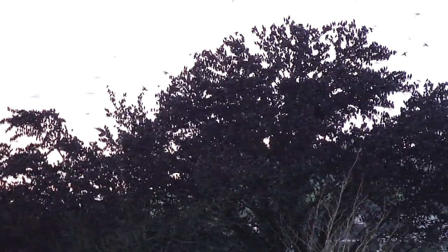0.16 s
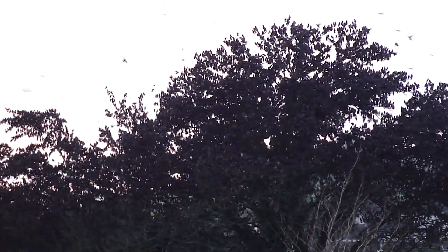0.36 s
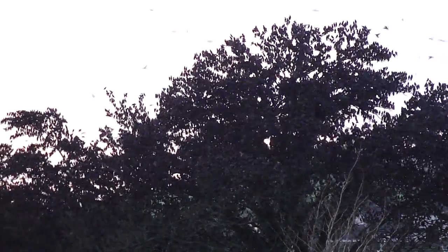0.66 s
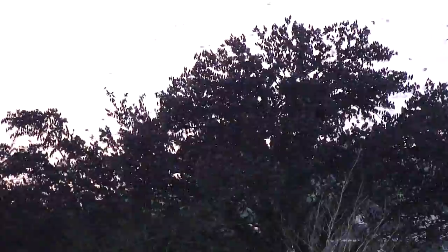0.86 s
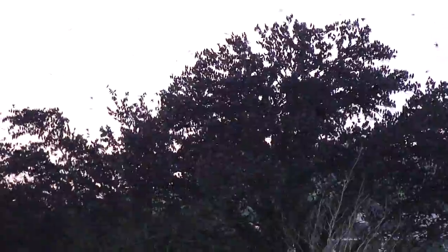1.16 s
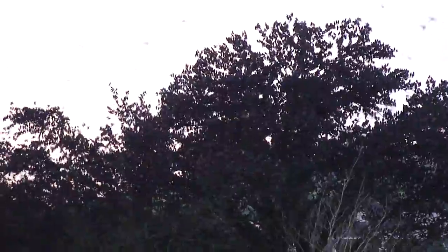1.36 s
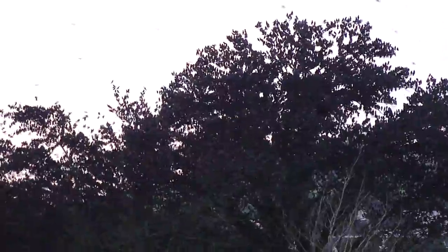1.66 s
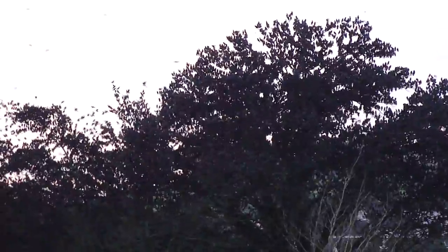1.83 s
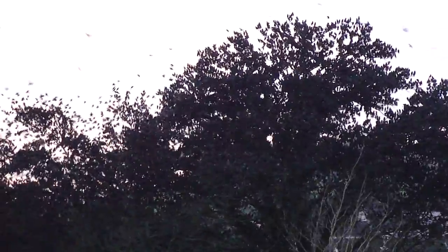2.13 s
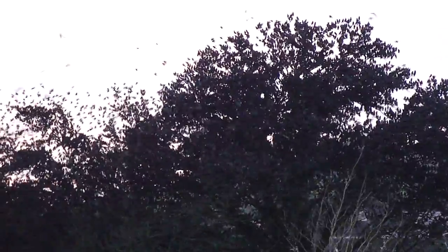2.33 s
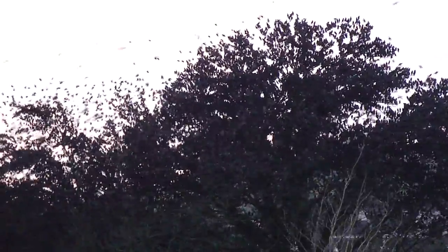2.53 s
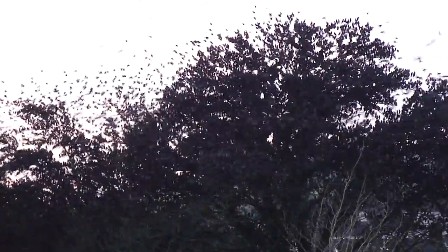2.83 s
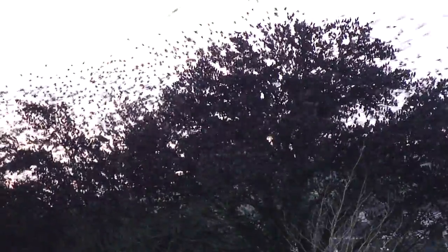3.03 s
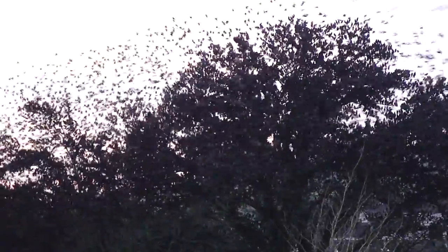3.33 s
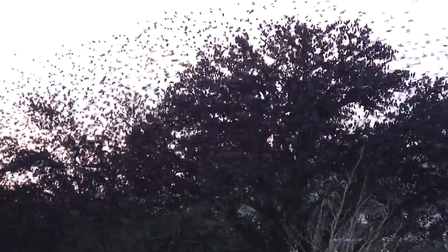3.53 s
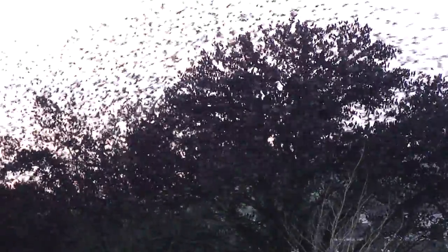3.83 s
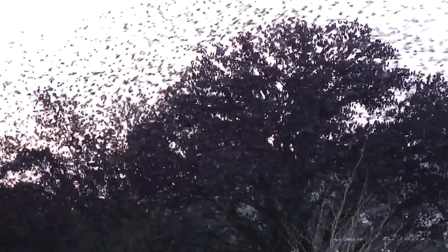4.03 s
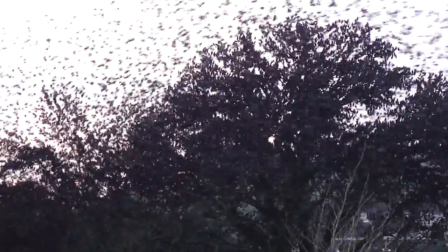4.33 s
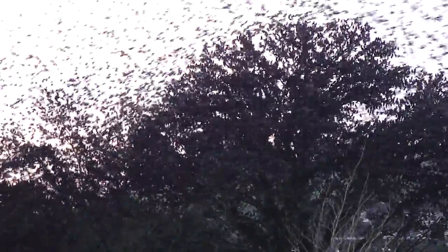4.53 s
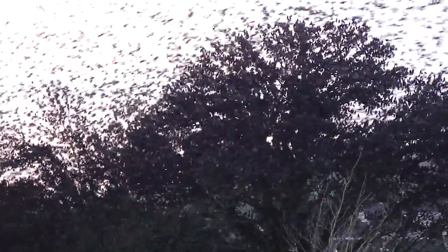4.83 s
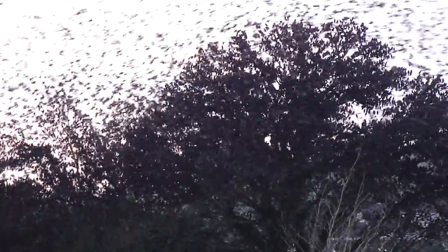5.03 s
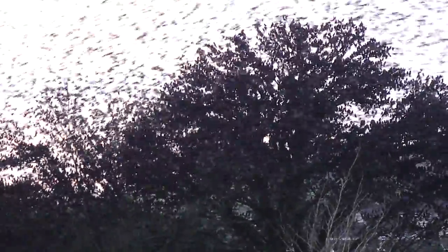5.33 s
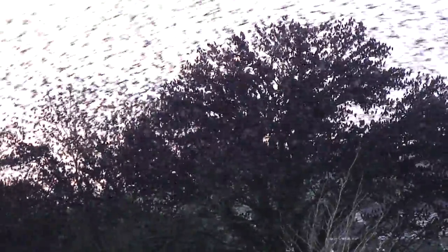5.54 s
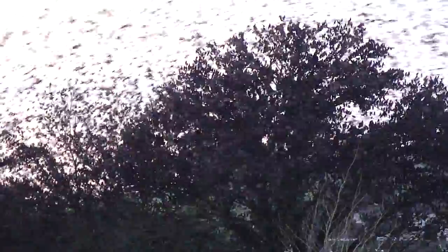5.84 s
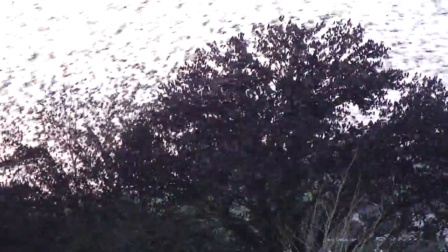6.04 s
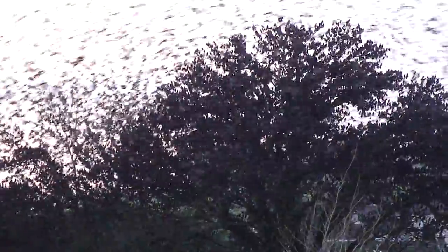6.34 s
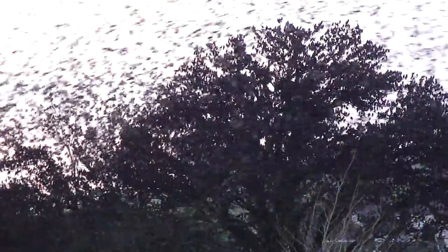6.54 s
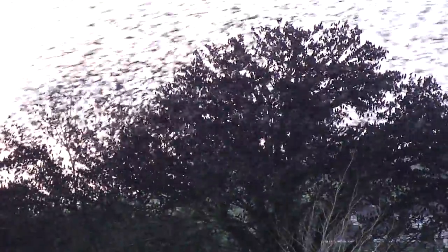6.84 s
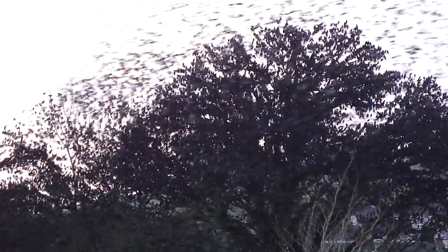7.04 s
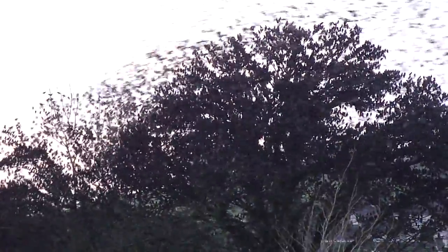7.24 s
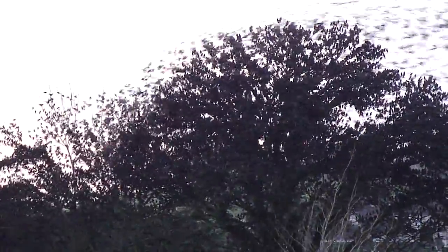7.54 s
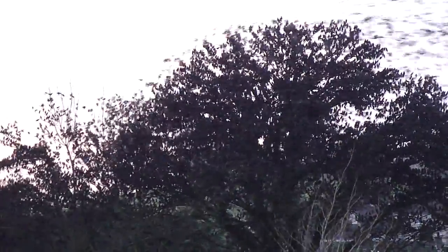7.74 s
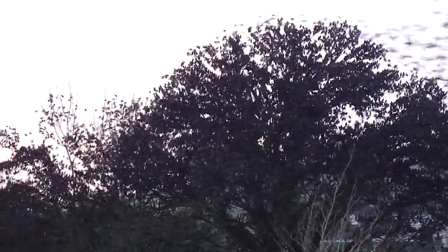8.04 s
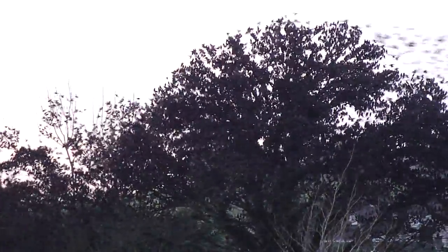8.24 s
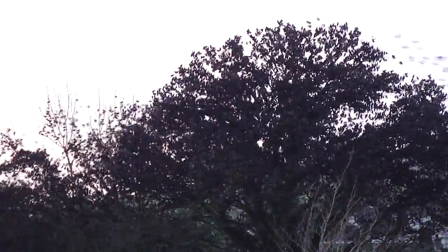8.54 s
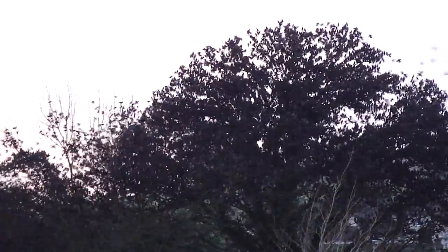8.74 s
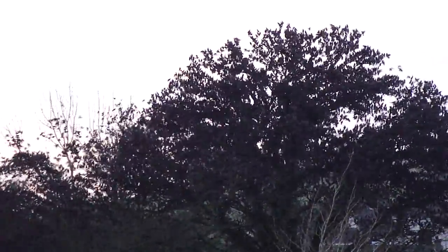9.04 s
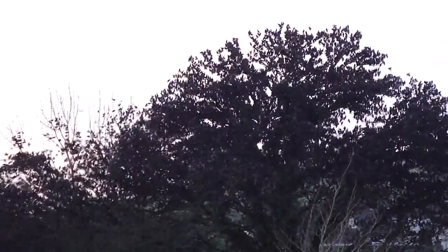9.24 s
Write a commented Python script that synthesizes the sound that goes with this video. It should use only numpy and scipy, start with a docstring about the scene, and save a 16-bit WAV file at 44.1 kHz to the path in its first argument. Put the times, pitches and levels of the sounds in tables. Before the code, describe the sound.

Thousands of roosting starlings rasp and whistle, then lift off, leaving thinner twittering flurries, a brief clear songbird phrase and swelling airy noise.

```python
"""Starlings leaving their roost at dusk

A wall of rasping calls in the trees thins out as the flock takes off. Crowds are built from many short,
harsh tones of unsteady pitch; twittering flares up in flurries, and whistles and screeches stand out.
A songbird close by sings one short phrase made of gliding tones. Behind them lie a far babble of lower
voices and a soft rush of shaped noise that swells at the end."""
import sys
import numpy as np
from scipy import signal
from scipy.fft import rfft, irfft, next_fast_len
from scipy.io import wavfile
from scipy.ndimage import uniform_filter1d

SR = 44100
rng = np.random.default_rng(int(sys.argv[2]) if len(sys.argv) > 2 else 0)


def generate_wav(sig):
    """Save sig (samples, or channels by samples) to the path in sys.argv[1] as 16-bit PCM at SR."""
    pcm = np.round(np.clip(np.atleast_2d(sig).T, -1, 1) * 32767).astype(np.int16)
    wavfile.write(sys.argv[1], SR, pcm)


N = 414099
TIME = np.arange(N) / SR

# Tone shaping of the perched birds' calls: f/Hz, level/dB
ROOST_COLOUR = [(1800, -34), (2800, -8), (3600, -6), (4100, -6.5), (4600, -3.5), (5050, 0.5), (5250, -0.5),
                (5450, 2), (5600, -2.5), (5850, 2.5), (6400, 0), (7000, -7), (7600, -4.5), (8500, -16.5)]
# Tone shaping of the calls on the wing: f/Hz, level/dB
FLIGHT_COLOUR = [(2400, -10), (3300, -0.5), (3900, 0.5), (4130, -1.5), (4700, 1.5), (4870, 2.5),
                 (5050, 2.5), (5270, 2), (5450, 2), (5600, 1.5), (6000, 2), (7000, -6.5), (7600, -10),
                 (8500, -36)]
# Tone shaping of the shrill top of the calls: f/Hz, level/dB
SHRILL_COLOUR = [(6300, 0), (7400, -0.5), (8000, 0.5), (8600, -1.5), (9200, -4.5), (10000, -11.5),
                 (11000, -40)]
# Chatter of the birds on the wing, with a hush soon after take-off: t/s, level/dB
FLIGHT_LEVEL = [(2.6, -44.5), (3.6, -42.5), (4.25, -52.5), (5.3, -43.5), (6.0, -44.5), (7.0, -40),
                (8.0, -42.5), (9.39, -43)]
# Shrill top of the birds on the wing: t/s, level/dB
FLIGHT_SHRILL_LEVEL = [(2.6, -52), (4.2, -53), (6.7, -48.5), (7.8, -52), (9.0, -45)]
# Flurries of twittering: t of the middle/s, length at half height/s, f/Hz, level/dB, shrill top level/dB
FLURRIES = [(3.048, 0.17, 6160, -45, -51), (3.245, .055, 5820, -41, -56), (3.808, 0.07, 5840, -39.5, -47),
            (3.977, 0.08, 5700, -42, -51), (4.099, 0.067, 5880, -44, -51), (4.531, 0.13, 6000, -49, -49),
            (4.79, .07, 5800, -53, -49), (4.942, 0.12, 6020, -40, -47), (5.37, 0.072, 5650, -47, -49),
            (5.62, 0.086, 5870, -38, -50), (5.819, 0.082, 5960, -40, -50), (6.022, .06, 5200, -44, -54),
            (6.139, 0.11, 5900, -42, -50), (6.286, 0.065, 5000, -43, -60), (6.39, .07, 5900, -45, -47),
            (6.604, 0.093, 5750, -40, -55), (6.824, 0.13, 5670, -43.5, -54), (7.248, 0.085, 5800, -46, -50)]
# Whistles of the nearest starlings:
# t/s, length/s, start f/Hz, middle f/Hz, end f/Hz, level/dB, burr swing f/Hz (0 is a clean note)
WHISTLES = [(0.0, 0.084, 7270, 7630, 7730, -34.5, 400), (0.202, 0.083, 7860, 7650, 8000, -40, 0),
            (.3, .1, 8440, 8660, 8200, -42, 100), (.39, .08, 8700, 8950, 8600, -47, 100),
            (0.456, 0.11, 7770, 8030, 6900, -40, 200), (.52, 0.069, 8300, 8300, 7900, -47, 0),
            (0.668, 0.16, 7900, 8030, 7450, -40, 100), (0.874, .085, 8600, 8700, 7000, -45, 100),
            (0.952, .08, 7700, 8550, 8450, -45, 100), (1.037, 0.15, 8570, 8300, 7230, -39.5, 150),
            (1.18, 0.12, 8050, 7750, 7750, -37, 80), (1.214, .061, 6100, 5380, 4850, -40, 0),
            (1.245, .045, 6650, 6680, 6350, -38, 100), (1.353, .08, 8850, 8500, 8000, -43, 100),
            (1.43, .08, 8100, 7850, 7050, -38, 100), (1.423, .055, 7300, 6850, 6150, -37, 100),
            (1.72, .06, 8450, 8350, 7700, -41, 150), (1.777, .05, 7650, 7950, 8000, -39, 0),
            (1.99, 0.059, 7400, 7800, 8600, -40, 150), (2.208, 0.046, 6150, 6400, 6400, -36, 261),
            (2.24, .025, 5870, 5800, 5750, -36, 0), (2.277, 0.071, 8750, 8680, 8800, -47, 0),
            (2.71, .1, 8060, 8000, 7900, -51, 100), (2.978, 0.062, 5500, 6230, 5600, -40.5, 400),
            (3.053, .047, 6500, 6400, 5700, -42, 200), (3.1, .07, 7500, 8000, 8300, -51, 100),
            (3.4, .082, 7100, 7730, 8200, -47, 200), (3.575, .026, 6250, 6400, 6550, -40, 150),
            (3.615, .03, 7200, 7280, 7350, -46, 0), (3.678, 0.056, 7400, 7700, 7400, -42.5, 200),
            (3.68, 0.1, 5880, 5720, 6150, -44.5, 100), (4.953, .04, 9300, 8550, 8650, -48, 50),
            (4.947, .026, 5500, 5250, 5100, -40, 200), (5.347, 0.098, 5900, 6080, 5900, -45, 150),
            (5.487, .05, 7100, 6850, 6750, -43, 250), (5.648, 0.026, 8000, 8150, 7900, -45, 0),
            (5.685, .03, 8250, 8250, 7950, -51, 0), (5.741, 0.056, 6700, 6370, 5880, -42, 350),
            (5.783, .03, 4650, 4800, 5200, -43, 250), (5.835, 0.021, 4950, 5100, 5200, -39, 300),
            (5.875, .03, 7900, 8020, 7950, -49, 0), (5.895, .065, 6500, 6300, 6000, -48, 50),
            (5.9, .035, 5150, 5050, 4860, -43, 150), (6.118, .035, 7600, 8150, 8400, -48, 50),
            (6.168, 0.048, 8450, 8480, 8100, -53, 50), (6.405, .065, 7800, 7870, 8250, -49, 100),
            (6.486, 0.036, 8250, 8300, 8050, -42, 130), (6.82, 0.046, 6250, 6160, 6000, -48, 100),
            (7.015, 0.048, 6600, 6680, 6600, -40, 200), (7.41, 0.055, 2570, 2480, 2540, -43, 150),
            (7.79, .059, 5850, 6000, 5850, -42.5, 200), (7.95, .05, 5600, 5530, 5750, -47, 100),
            (7.98, .033, 7600, 7650, 7200, -44, 150), (8, 0.034, 5800, 6100, 6370, -34, 120),
            (8.01, 0.045, 7700, 8150, 8400, -41.5, 480), (8.043, 0.059, 8440, 8860, 8700, -44.5, 50),
            (8.043, .03, 5700, 6020, 6200, -44, 50), (8.075, .03, 5800, 6300, 6530, -42, 80),
            (8.125, .04, 6160, 5950, 5200, -42, 150), (8.208, 0.037, 6000, 6100, 6350, -41, 100),
            (8.225, .016, 7000, 7300, 7550, -46, 0), (8.26, 0.044, 6350, 6450, 6500, -49, 300),
            (8.355, .022, 5580, 5620, 5640, -42, 0), (8.438, .055, 7450, 7900, 7050, -45, 50)]
# Screeches of the nearest starlings: t/s, length/s, f/Hz, width of the unsteady pitch f/Hz, level/dB
SCREECHES = [(0.538, 0.023, 7300, 300, -35), (0.947, 0.068, 6370, 690, -33.5), (1.859, .08, 6280, 705, -36),
             (2.103, 0.06, 5750, 910, -35.5), (3.722, 0.03, 2970, 494, -40), (4.322, 0.05, 6280, 550, -39),
             (4.382, 0.052, 5680, 500, -42.5), (4.45, 0.06, 6060, 500, -45), (4.545, 0.083, 5470, 690, -44),
             (5.338, .035, 5200, 500, -43), (7.106, 0.07, 6200, 450, -41.5), (7.158, .05, 5600, 398, -42),
             (7.428, 0.05, 5750, 696, -39.5), (8.18, .022, 6250, 450, -39), (8.917, 0.039, 5960, 500, -38)]
# Echoes of each call off the nearest trunks: delay t/s, level/dB
TRUNK_ECHOES = [(.005175, -15), (.007475, -18)]
# The songbird's four opening chirps: t of the top/s, top f/Hz, length as a share of the usual, level/dB
CHIRPS = [(2.235, 5100, 0.57, -36), (2.329, 5000, 0.96, -32.5), (2.424, 4750, .95, -31.5),
          (2.526, 5300, 1.2, -33.5)]
# Strength of a chirp at each pitch, with peaks at two of them: f/Hz, level/dB
CHIRP_COLOUR = [(2800, -7), (3150, -6), (3450, 2), (3750, -2), (4000, -4), (4200, -1), (4550, 4),
                (4850, -7), (5300, -2)]
# Dips as the chirping voice changes register: t after the top in a chirp of usual length/s, level/dB
CHIRP_BREAKS = [(.005, -5), (.016, -4)]
# The flat note that leads into the first chirp, then the songbird's warble of quick slurs:
# t/s, length/s, start f/Hz, middle f/Hz, end f/Hz, level/dB
SONG = [(2.22, 0.014, 4650, 4670, 4720, -30.5), (2.622, .044, 4980, 5070, 5000, -40),
        (2.671, 0.047, 5000, 4970, 4960, -39.5), (2.813, .016, 4680, 4720, 4740, -36),
        (2.836, .014, 3330, 3330, 3350, -34), (2.856, .015, 4720, 4530, 4300, -38),
        (2.874, .007, 3250, 3450, 3800, -31), (2.878, .022, 3750, 3860, 3550, -39),
        (2.897, .015, 3500, 3200, 3250, -32), (2.908, 0.019, 3240, 3450, 3480, -29.5),
        (2.928, .009, 3520, 3400, 2900, -31.5), (2.947, .025, 2750, 3280, 2750, -32),
        (3.139, .006, 4300, 4450, 4600, -37), (3.149, .006, 4350, 4600, 4950, -34),
        (3.152, .015, 5750, 5860, 5550, -36), (3.17, .008, 5350, 5200, 5050, -34),
        (3.204, .016, 5900, 5600, 5900, -41), (3.229, .0053, 4650, 4500, 4250, -34),
        (3.326, .013, 5950, 5370, 5100, -37.5), (3.342, .0055, 4200, 4700, 5300, -38),
        (3.344, .014, 5200, 5100, 4850, -33), (3.357, .016, 4900, 4680, 4500, -32),
        (3.373, .014, 5850, 5770, 5600, -36), (3.423, .012, 4870, 4620, 4330, -32),
        (3.437, 0.016, 3670, 4140, 4350, -36), (3.447, .017, 4300, 4420, 4650, -27),
        (3.512, 0.015, 4100, 5400, 6650, -36), (3.523, .008, 3400, 4630, 5500, -34),
        (3.53, .019, 5300, 5020, 4850, -33), (3.553, .028, 4850, 4650, 4380, -28.5),
        (3.575, .021, 4540, 4380, 4350, -32.5), (3.598, .02, 4680, 4700, 4680, -34),
        (3.62, .023, 3770, 3830, 4200, -35), (3.639, .012, 4250, 4650, 4700, -33),
        (3.648, .007, 4500, 3700, 3300, -35)]
# The far part of the flock: t/s, level/dB
BABBLE_LEVEL = [(0.0, -32.5), (1.5, -34), (3.2, -40), (6.0, -40.5), (7.4, -42.5), (9.39, -40)]
# Tone shaping of the far flock: f/Hz, level/dB
BABBLE_COLOUR = [(1600, -25), (2000, -7), (2200, -2.5), (2370, 0.5), (2520, -1.5), (2680, -1.5),
                 (2950, -6.5), (3500, -8.5), (4500, -8.5)]
# Broad outdoor rush of wings and distant traffic: t/s, level/dB
RUSH_LEVEL = [(0.0, -41), (0.9, -41), (1.25, -38.5), (4.0, -39), (6.8, -40.5), (8.08, -40), (8.38, -36),
              (9.39, -35.5)]
# Tone shaping of the rush: f/Hz, level/dB
RUSH_COLOUR = [(230, -29), (380, -7), (480, -3.5), (620, -1), (760, 1.5), (870, -1.5), (1050, 1),
               (1200, -2.5), (1400, -7), (1900, -15.5)]
# Tone shaping of its airy top: f/Hz, level/dB
UPPER_RUSH_COLOUR = [(1000, -5), (1350, -1.5), (1600, 3), (1900, 3), (2500, 0), (3300, -9), (4500, -10),
                     (6500, -5.5), (8500, -12.5), (11000, -21.5)]
# Low register of the rush: t/s, level/dB
LOW_RUSH_LEVEL = [(0.0, -62), (1.17, -70), (1.25, -46), (1.7, -49.5), (2.4, -52.5), (4.0, -50.5),
                  (4.7, -56), (7.9, -55.5), (8.35, -51), (9.39, -55)]
# Tone shaping of the low register: f/Hz, level/dB
LOW_RUSH_COLOUR = [(310, -21), (400, -2.5), (460, 0.5), (560, -7), (680, -15)]
# Tone shaping of the rumble that follows the rush: f/Hz, level/dB
RUMBLE_COLOUR = [(75, -15), (115, -5.5), (155, 2.5), (215, -1), (265, 1.5), (330, -2), (450, -10.5)]
# Deep rumble of the open air: t/s, level/dB
DEEP_RUMBLE_LEVEL = [(0.0, -69), (2.9, -64.5), (4.0, -61.5), (7.7, -64.5), (9.39, -63)]
# Tone shaping of the deep rumble: f/Hz, level/dB
DEEP_COLOUR = [(20, -27), (35, -18), (48, -12), (58, -10), (72, -1), (100, 2), (135, -16)]
# The swell that deepens the rush at the end: t/s, level/dB
SWELL_LEVEL = [(7.2, -62), (8.0, -51), (8.4, -43.5), (9.39, -43)]
# Tone shaping of the swell: f/Hz, level/dB
SWELL_COLOUR = [(30, -26), (70, -15), (150, -2), (220, -10), (300, -8.5), (360, 2), (440, -9), (560, 2),
                (660, 2), (850, -9)]

TAKE_OFF_S, TAKE_OFF_SPREAD_S = 2.16, 0.15   # half the flock is up by then; how gradually the change happens
# The perched birds: chatter, shrill calls, and the blur of the farthest
ROOST_DB, ROOST_SHRILL_DB, ROOST_WASH_DB = -30.5, -40, -40.5
# In a flurry, birds' pitches lie up to SPREAD either side of the middle and each chip falls by about SWEEP
TWITTER_SPREAD_HZ, TWITTER_SWEEP_HZ = 1540, 1110
TWITTER_CHIP_S, TWITTER_PER_S = 0.00607, 85   # length of a chip; chips of one bird, roughly
BURR_PER_S = 135   # a burred note swings in pitch about this often

# Farther birds whistle at random: a few throughout, a throng in the roost, and lower ones
FAINT_WHISTLE_DB, FAINT_WHISTLE_RANGE_HZ = -52, (4276, 8200)
ROOST_WHISTLE_DB, ROOST_WHISTLE_RANGE_HZ = -44.5, (4500, 8180)
LOW_WHISTLE_DB, LOW_WHISTLE_RANGE_HZ = -54, (2300, 3500)
FAINT_WHISTLE_S = 0.065   # average length
FAINT_WHISTLE_GLIDE_HZ = 750   # spread of the slants in the middle of the faint range
FAINT_WHISTLE_ARCH_HZ = 127.6   # each bows upward by this much in its middle
AIR_LOSS_DB_PER_HZ, AIR_LOSS_FROM_HZ = 0.0028, 6100   # distance weakens the highest random whistles

# Single chirps that stand out of the crowd, perched and on the wing
ROOST_CHIRP_DB, FLIGHT_CHIRP_DB = -43, -51.5
CROWD_CHIRP_RANGE_HZ = (4414, 7300)
CROWD_CHIRP_S = 0.02   # average length
CROWD_CHIRP_GLIDE_HZ, CROWD_CHIRP_BURR_HZ = 900, 50   # spread of the glides; swing of the burr

# Songbird chirp of usual length: a quick hook over the top, then a longer slide
CHIRP_RISE_S, CHIRP_HOOK_S, CHIRP_FALL_S = 0.01, 0.0076, 0.042
CHIRP_SLIDE_HZ, CHIRP_SAG_HZ_PER_S = 4160, 31000   # the slide's pitch at the top moment, and its fall
CHIRP_BREAK_WIDTH_S = 0.002
CHIRP_WAVER = 0.023   # the pitch trembles by this share

RUMBLE_BELOW_DB, UPPER_RUSH_BELOW_DB = 12, 1.4   # both rise and fall with the rush
CUTOFF_HZ = 10950


def near_flock():
    """Dense chirping in the roost gives way to thinner, harsher calls on the wing, which flare up in flurries."""
    roosting = np.sqrt(perched_share())
    flying = np.sqrt(1 - perched_share())
    twittering, flurry_shrill_gain = flurries()

    perched = crowd(3000, 9300, width_hz=550, length_range_s=0.02205, slant=0.402,
                    spread_db=-3.0, blur_db=2.5, count=5000)
    airborne = crowd(3000, 9300, width_hz=800, length_range_s=0.025, slant=0.363,
                     spread_db=9, blur_db=2.0, count=3000)
    shrill = crowd(6500, 9200, width_hz=700, length_range_s=0.0351, slant=0.206,
                   spread_db=7, blur_db=0.0, count=2000)
    perched = coloured(perched, ROOST_COLOUR)
    airborne = restless(coloured(airborne, FLIGHT_COLOUR), swing_db=1.0, rate=14)
    shrill = restless(coloured(shrill, SHRILL_COLOUR), swing_db=2.0, rate=17)

    perched_gain = from_db(ROOST_DB) * roosting
    flight_gain = gain_over_time(FLIGHT_LEVEL) * flying
    # independent strengths add as powers
    shrill_gain = np.hypot(from_db(ROOST_SHRILL_DB) * roosting, gain_over_time(FLIGHT_SHRILL_LEVEL) * flying)
    shrill_gain = np.hypot(shrill_gain, flurry_shrill_gain)
    return perched_gain * perched + flight_gain * airborne + twittering + shrill_gain * shrill


def perched_share():
    """Share of the flock still in the trees: the alarm spreads from bird to bird."""
    return 0.5 - 0.5 * np.tanh((TIME - TAKE_OFF_S) / (2 * TAKE_OFF_SPREAD_S))


def crowd(low_hz, high_hz, width_hz, length_range_s, slant, spread_db, blur_db, count):
    """Many birds share a stock of short slanting rasps at various levels, over the blur of countless others."""
    repertoire = []
    for length, pitch, harsh, glide, buzz in rng.random((min(count // 5, 350), 5)):
        # lengths vary by length_range_s above the shortest
        call = screech(0.006 + length_range_s * length, low_hz + pitch * (high_hz - low_hz),
                       width_hz * (0.12 + harsh ** 2), slant * (glide - 0.6),
                       buzz_hz=90 + 130 * buzz, buzz_depth=0.55)
        repertoire.append(call)
    calls = np.zeros(N)
    for k, (when, loudness_draw) in enumerate(rng.random((count, 2))):
        rasp = repertoire[k % len(repertoire)]
        add(calls, when * N / SR, from_db(spread_db * loudness_draw) * rasp)
    # the blur is noise over all pitches, so the calls are scaled to the share their band takes up
    band_share = np.sqrt(2 * (high_hz - low_hz) / SR)
    blur = from_db(blur_db) * rng.standard_normal(N)
    return rms_one(band_share * rms_one(calls) + blur)


def restless(x, swing_db, rate):
    """Calling waxes and wanes by chance."""
    return x * from_db(swing_db * wander(N, rate))


def flurries():
    """Twittering swells and fades among the branches; also gives its shrill strength, pulsing with the chips."""
    chatter, shrill = np.zeros((2, N))
    for s, length, hz, db, shrill_db in FLURRIES:
        voices = twitter(2 * length, hz, count=5)
        swell = np.hanning(len(voices))
        pulsing = rms_one(uniform_filter1d(np.abs(voices), size=180))
        add(chatter, s - length, from_db(db) * swell * voices)
        add(shrill, s - length, from_db(shrill_db) * swell * pulsing)
    return among_trees(chatter, wet_db=-6, t60=0.13), shrill


def twitter(length, middle_hz, count):
    """Several birds, each around its own pitch, rattle off steep falling chips; rms 1."""
    out = np.zeros(N)
    for own_hz in middle_hz + TWITTER_SPREAD_HZ * np.linspace(-1, 1, count):
        gap = rng.uniform(0.7, 1.2) / TWITTER_PER_S
        for s in np.arange(-gap * rng.random(), length, gap):
            late, sharp, loud = rng.standard_normal(3)
            hz = own_hz * (1 + 0.048 * sharp)
            chip = screech(TWITTER_CHIP_S, hz, 270, -TWITTER_SWEEP_HZ / hz, buzz_hz=150, buzz_depth=0.11)
            add(out, s + 0.1 * gap * late, from_db(1.4 * loud) * chip)
    return rms_one(out[:int(length * SR)])


def single_starlings():
    """Whistles and screeches of the nearest starlings, with a scatter of random whistles and chirps."""
    out = np.zeros(N)
    end_s = N / SR
    faint = faint_whistles(end_s, FAINT_WHISTLE_DB, FAINT_WHISTLE_RANGE_HZ, count=130)
    faint += faint_whistles(TAKE_OFF_S, ROOST_WHISTLE_DB, ROOST_WHISTLE_RANGE_HZ, count=110)
    faint += faint_whistles(end_s, LOW_WHISTLE_DB, LOW_WHISTLE_RANGE_HZ, count=60)
    chirps = crowd_chirps(0, TAKE_OFF_S, ROOST_CHIRP_DB, count=420)
    chirps += crowd_chirps(TAKE_OFF_S, end_s, FLIGHT_CHIRP_DB, count=260)
    for s, length, *pitches, db, burr_hz in WHISTLES + faint + chirps:
        note = whistle(length, pitches, waver=0.0057, flutter_db=2.5, burr_hz=burr_hz, roundness=0.16)
        add(out, s, from_db(db) * note)
    for s, length, hz, width_hz, db in SCREECHES:
        call = screech(length, hz, width_hz, glide=-0.0355, buzz_hz=146.0, buzz_depth=0.22)
        add(out, s, from_db(db) * call)
    return among_trees(off_trunks(out), wet_db=-7.5, t60=0.45)


def faint_whistles(until_s, db, range_hz, count):
    """Rows for thin arched whistles at random times and pitches; high ones glide farther and can be weaker."""
    rows = []
    for k, (when, pitch, glide, long) in enumerate(rng.random((count, 4))):
        s = until_s * (k + when) / count
        length = FAINT_WHISTLE_S * (0.5 + long)
        hz = np.interp(pitch, [0, 1], range_hz)
        slant = FAINT_WHISTLE_GLIDE_HZ * (glide - 0.6) * hz / np.mean(FAINT_WHISTLE_RANGE_HZ)
        loss_db = AIR_LOSS_DB_PER_HZ * max(hz - AIR_LOSS_FROM_HZ, 0)
        rows.append((s, length, hz - slant, hz + FAINT_WHISTLE_ARCH_HZ, hz + slant, db - loss_db, 0))
    return rows


def crowd_chirps(from_s, until_s, db, count):
    """Rows for short chirps, mostly falling in pitch, scattered through a stretch of time."""
    rows = []
    for k, (when, pitch, glide, long) in enumerate(rng.random((count, 4))):
        s = from_s + (until_s - from_s) * (k + 2 * when) / count
        length = CROWD_CHIRP_S * (0.5 + long)
        hz = np.interp(pitch, [0, 1], CROWD_CHIRP_RANGE_HZ)
        fall = CROWD_CHIRP_GLIDE_HZ * (glide - 0.25)
        rows.append((s, length, hz + fall / 2, hz, hz - fall, db, CROWD_CHIRP_BURR_HZ))
    return rows


def whistle(length, pitches_hz, waver, flutter_db, burr_hz, roundness):
    """One note arches through three pitches, swells and trembles; a burr swings its pitch quickly."""
    u = np.linspace(0, 1, max(int(length * SR), 64))
    arch = np.polyval(np.polyfit([0, 0.5, 1], pitches_hz, 2), u)
    hz = arch * (1 + waver * wander(len(u), 480))
    cycles = np.cumsum(BURR_PER_S * (1 + 0.12 * wander(len(u), 74))) / SR
    sawtooth = 2 * (cycles % 1) - 1
    hz = hz + burr_hz * (sawtooth + 0.52 * wander(len(u), 915))
    swell = np.abs(np.sin(np.pi * u)) ** roundness * from_db(flutter_db * wander(len(u), 176))
    return rms_one(swell * np.sin(2 * np.pi * np.cumsum(hz) / SR))


def screech(length, hz, width_hz, glide, buzz_hz, buzz_depth):
    """A harsh call: the tone from the bird's voice organ is chaotic in pitch and beats in fast pulses."""
    u = np.linspace(0, 1, max(int(length * SR), 64))
    beat = np.sin(2 * np.pi * np.cumsum(buzz_hz * (1 + 0.15 * wander(len(u), 73))) / SR)
    unsteadiness = width_hz * (0.35 * beat + 0.5 * wander(len(u), 3 * width_hz))
    pitch = hz * (1 + glide * (u - 0.5)) + unsteadiness
    swell = np.abs(np.sin(np.pi * u)) ** 0.2 * (1 + buzz_depth * beat)
    return rms_one(swell * np.sin(2 * np.pi * np.cumsum(pitch) / SR))


def songbird():
    """Four hooked chirps, a flat note leading into the first, and a warble of quick, clean slurs from close by."""
    out = np.zeros(N)
    for s, top_hz, stretch, db in CHIRPS:
        add(out, s - CHIRP_RISE_S * stretch, from_db(db) * chirp(top_hz, stretch, flutter_db=2.5))
    for s, length, *pitches, db in SONG:
        note = whistle(length, pitches, waver=0.0092, flutter_db=2.0, burr_hz=0, roundness=0.45)
        add(out, s, from_db(db) * note)
    return among_trees(off_trunks(out), wet_db=-11.0, t60=0.17)


def chirp(top_hz, stretch, flutter_db):
    """A tone hooks up over its top and slides down, flaring as it passes each resonance."""
    # finer steps of t give more samples, so the chirp lasts longer
    t = np.arange(-CHIRP_RISE_S, CHIRP_FALL_S, 1 / (SR * stretch))
    slide = CHIRP_SLIDE_HZ - CHIRP_SAG_HZ_PER_S * np.abs(t)
    hook = np.exp(-np.abs(t / CHIRP_HOOK_S) ** 3)
    hz = slide + (top_hz - slide) * hook
    db = np.interp(hz, *np.transpose(CHIRP_COLOUR)) + flutter_db * wander(len(t), 320)
    for s, dip_db in CHIRP_BREAKS:
        db = db + dip_db * np.exp(-((t - s) / CHIRP_BREAK_WIDTH_S) ** 2)
    phase = 2 * np.pi * np.cumsum(hz * (1 + CHIRP_WAVER * wander(len(t), 620))) / SR
    soft_ends = signal.windows.tukey(len(t), 0.1)
    return rms_one(soft_ends * from_db(db) * np.sin(phase))


def off_trunks(x):
    """Early echoes off the trunks beat against a gliding note and break it up."""
    out = x.copy()
    for delay_s, db in TRUNK_ECHOES:
        add(out, delay_s, from_db(db) * x)
    return out


def among_trees(x, wet_db, t60):
    """Trunks and leaves scatter a diffuse tail behind each call; it fades by 60 dB in t60 seconds."""
    t = np.arange(SR // 2) / SR
    tail = rng.standard_normal(len(t)) * from_db(-60 * t / t60) * (t > 0.006)
    scattered = signal.fftconvolve(x, tail / np.linalg.norm(tail))[:N]
    return x + from_db(wet_db) * scattered


def far_flock():
    """The lower voices of the far birds merge into a babble."""
    voices = crowd(1800, 3400, width_hz=330, length_range_s=0.05, slant=0.16,
                   spread_db=3.0, blur_db=2.5, count=1800)
    return gain_over_time(BABBLE_LEVEL) * coloured(voices, BABBLE_COLOUR)


def rush():
    """Smooth noise in five registers, from deep rumble to an airy top the full roost adds to, and a late swell."""
    rush_gain = gain_over_time(RUSH_LEVEL)
    roost_wash = from_db(ROOST_WASH_DB) * np.sqrt(perched_share())
    upper_gain = np.hypot(rush_gain * from_db(-UPPER_RUSH_BELOW_DB), roost_wash)
    layers = [(gain_over_time(DEEP_RUMBLE_LEVEL), DEEP_COLOUR),
              (rush_gain * from_db(-RUMBLE_BELOW_DB), RUMBLE_COLOUR),
              (gain_over_time(LOW_RUSH_LEVEL), LOW_RUSH_COLOUR),
              (rush_gain, RUSH_COLOUR),
              (upper_gain, UPPER_RUSH_COLOUR),
              (gain_over_time(SWELL_LEVEL), SWELL_COLOUR)]
    return sum(gain * coloured(rng.standard_normal(N), colour) for gain, colour in layers)


def coloured(x, spectrum):
    """Shape a sound by a spectrum that falls away beyond its ends; rms 1."""
    hz, db = np.transpose(spectrum)
    size = next_fast_len(N)
    log_f = np.log(np.arange(size // 2 + 1) * SR / size + 1)
    beyond = np.abs(log_f - np.clip(log_f, np.log(hz[0]), np.log(hz[-1])))
    shape_db = np.interp(log_f, np.log(hz), db) - 60 * beyond
    return rms_one(irfft(rfft(x, size) * from_db(shape_db), size)[:N])


def gain_over_time(rows):
    """Gain for every sample, from a table of times and levels."""
    s, db = np.transpose(rows)
    return from_db(np.interp(TIME, s, db))


def from_db(db):
    """Decibels to gain."""
    return 10 ** (np.asarray(db) / 20)


def rms_one(x):
    """Scale to an average power of 1."""
    return x / np.sqrt(np.mean(x ** 2) + 1e-20)


def wander(size, rate):
    """Random drift around 0: straight lines between random values drawn rate times a second."""
    steps = np.arange(size) * rate / SR
    count = int(steps[-1]) + 2
    return np.interp(steps, np.arange(count), rng.standard_normal(count))


def add(out, s, sound):
    """Mix a sound in at a time in seconds, dropping what lies outside."""
    start = int(s * SR)
    low, high = max(start, 0), min(start + len(sound), N)
    if high > low:
        out[low:high] += sound[low - start:high - start]


def scene():
    """Everything, heard from one spot."""
    return (near_flock() + single_starlings() + songbird() + far_flock() + rush())[None]


def record(dry):
    """The top of the treble is cut steeply."""
    return signal.sosfilt(signal.ellip(12, 0.1, 80, CUTOFF_HZ, fs=SR, output="sos"), dry)


dry = scene()
out = record(dry)
generate_wav(out)
```